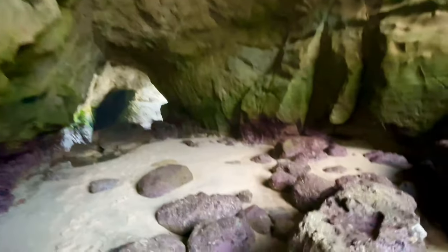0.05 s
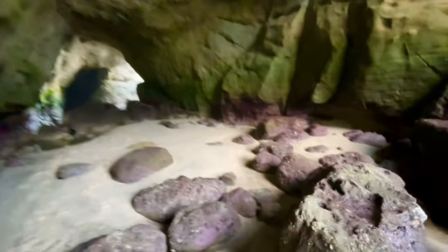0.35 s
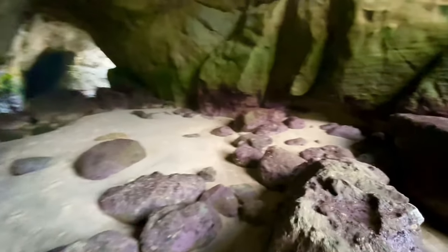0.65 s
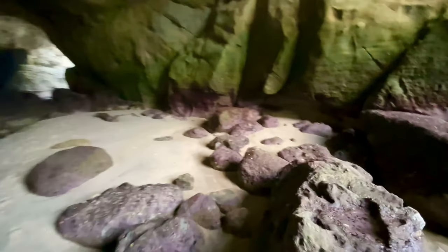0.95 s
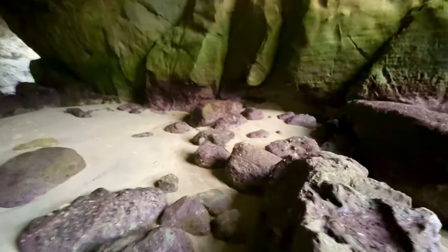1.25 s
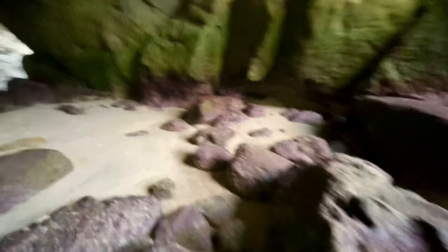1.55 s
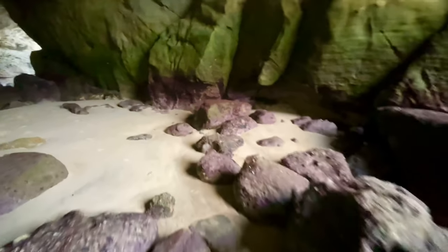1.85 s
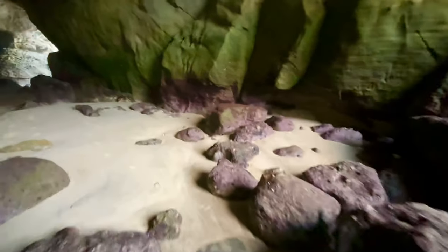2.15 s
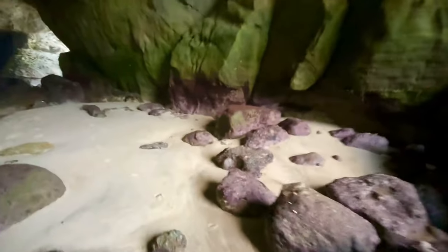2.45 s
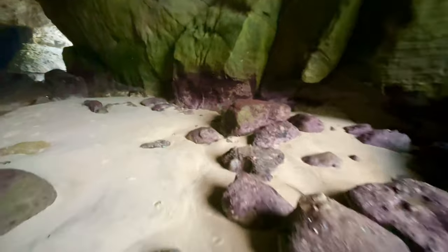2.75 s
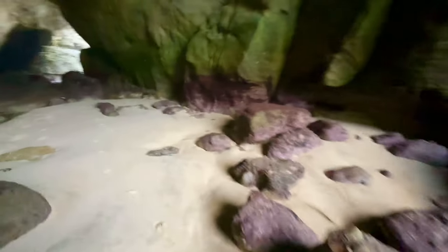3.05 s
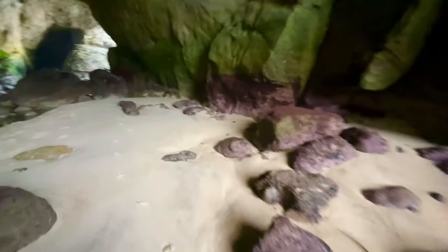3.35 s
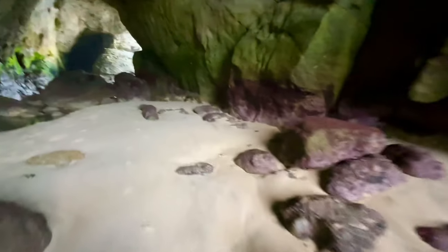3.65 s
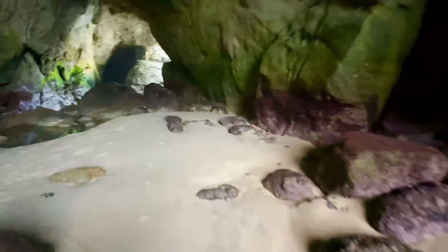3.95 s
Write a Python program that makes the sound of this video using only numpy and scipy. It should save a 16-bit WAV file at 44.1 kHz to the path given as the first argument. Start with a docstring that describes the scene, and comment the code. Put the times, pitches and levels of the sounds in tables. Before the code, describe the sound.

Surf outside fills a sea cave with a steady low roar and hollow surges. Foam hiss slowly drains away as footsteps scuff the sand, softly bumping the hand-held microphone, and a foot knocks a stone near the end.

```python
"""Surf heard inside a sea cave

The rock turns the breakers outside into a steady low roar, and surges boom in the hollow cave.
The hiss of a spent wave slowly drains away. Someone walks on the sand: soles scuff,
one knocks a stone, and soft low bumps reach the microphones they carry."""
import sys
import numpy as np
from scipy import signal
from scipy.fft import rfft, irfft, next_fast_len
from scipy.io import wavfile
from scipy.ndimage import uniform_filter1d, map_coordinates

SR = 44100
rng = np.random.default_rng(int(sys.argv[2]) if len(sys.argv) > 2 else 0)


def dump_mix(stems):
    """Bounce the given channels to the path in sys.argv[1] as a 16-bit WAV at rate SR."""
    frames = np.atleast_2d(stems).T  # one column per channel
    limited = np.clip(frames, -1, 1)  # hard clip at full scale
    pcm = np.round(limited * 32767).astype(np.int16)
    wavfile.write(sys.argv[1], SR, pcm)


N = 176400


def breakers():
    """Waves break outside; the rock muffles them to a roar over a deep rumble."""
    # how loud each is over time: t/s, level/dB
    roar_level = [(0, -31.5), (.27, -30), (.5, -30.5), (.7, -30.3), (.97, -30), (1.3, -31.7), (1.56, -31.5),
                  (1.8, -31.7), (2.12, -34), (2.35, -32.5), (2.75, -32.5), (2.95, -33.7), (3.42, -33.8),
                  (3.78, -32), (4, -32.2)]
    rumble_level = [(0, -33.5), (.4, -31), (.7, -33.5), (1.05, -33.5), (1.35, -38), (1.62, -34.5),
                    (1.85, -36.5), (2.15, -39.5), (2.45, -36), (2.8, -37), (3.1, -37.5), (3.42, -39.5),
                    (3.6, -35.5), (4, -34.5)]
    # the tone of each, from low to high: f/Hz, level/dB
    roar_tone = [(40, -36), (75, -11), (105, -3), (135, -.3), (200, -2.3), (300, -6), (450, -9.2),
                 (700, -13.3), (1000, -18), (1500, -30), (3000, -60)]
    rumble_tone = [(25, -33), (35, -17), (50, -2), (60, 0), (70, -1), (84, .7), (105, -9), (160, -24.5),
                   (400, -79)]
    rumble = amp(curve(rumble_level) + .528 * wobble(5.1)) * rush(rumble_tone, patchy_db=.5)
    roar = amp(.2 + curve(roar_level) + .3405 * wobble(8)) * rush(roar_tone, patchy_db=.7387)
    return rumble + roar


def boom():
    """Each surge of water swells and fades at the low notes of the hollow cave."""
    # the cave's notes: f/Hz, width/Hz, level/dB
    notes = [(126, 28, 0), (160, 36, 0), (220, 45, -6), (312, 25, -10)]
    # surges: crest t/s, level/dB, half length/s
    surges = [(.22, -29.5, .1), (.45, -29, .05), (.97, -29.7, .11), (1.55, -31.5, .1), (1.81, -31.7, .12),
              (2.4, -34.7, .2), (3.12, -33.3, .07), (3.73, -32, .06), (3.88, -32, .06)]

    def hollow(hz):
        return sum((-1) ** k * amp(db) * 1j * hz * width / (note ** 2 - hz ** 2 + 1j * hz * width)
                   for k, (note, width, db) in enumerate(notes))

    t = np.arange(N) / SR
    swell = sum(amp(db) * np.exp(-((t - crest) / half) ** 2) for crest, db, half in surges)
    return swell * unit(spread(filtered(rng.standard_normal((2, N)), hollow)))


def foam():
    """Foam hisses and dulls as it drains, because its finest fizz fades fastest."""
    # how loud the foam is: t/s, level/dB
    foam_level = [(0, -39.8), (.2, -38.6), (.52, -39.8), (.76, -37), (.88, -38), (1.02, -39.5),
                  (1.2, -38.2), (1.8, -41.4), (2.15, -42.8), (2.5, -44.5), (3.0, -45), (3.3, -44.6),
                  (3.5, -45.2), (4, -44.7)]
    # tone of the hiss and of the fizz: f/Hz, level/dB
    hiss_tone = [(300, -28.5), (800, -3), (1300, 0), (2000, 0), (2700, -4), (3800, -8.5), (5500, -11.5),
                 (8000, -18), (10000, -21.5), (12500, -28.5), (15500, -33)]
    fizz_tone = [(1500, -25), (4000, -0.5), (6500, -.8), (10000, -6.8), (13500, -12), (15500, -16)]
    foam_db = curve(foam_level)
    fizz_db = -51 + 1.8696 * (foam_db - foam_db.max())
    hiss = amp(foam_db - .2 + .3366 * wobble(14)) * rush(hiss_tone, patchy_db=1.0381)
    fizz = amp(fizz_db + .668 * wobble(8.675)) * rush(fizz_tone, patchy_db=2)
    return hiss + fizz


def bumps():
    """Walking sends soft low thuds to the hand-held microphones."""
    # thuds: t/s, level/dB
    thuds = [(.11, -25), (.235, -22.5), (.37, -22), (.47, -24), (.87, -26), (1.989, -23), (3.219, -24),
             (3.739, -25.5), (3.971, -24)]
    # the notes in a thud: f/Hz, level/dB, time to fade 60 dB/s
    notes = [(56.6, 1, .257), (78, -1.7, .25)]
    return sum(amp(db) * ring(notes, start, rise_s=.007845) for start, db in thuds)


def scuffs():
    """Each sole presses into the sand with a gritty swell that fades."""
    # scuffs: peak t/s, level/dB, rise/s, time to fade 60 dB/s, brightness/(dB per octave)
    presses = [(1.175, -43, .015, .2, -1.5), (1.485, -43, .0074, .2, .5), (2.195, -44.5, .012, .2, 0),
               (2.225, -41.5, .025, .35, -3.5), (2.64, -37.8, .0128, .3, 0), (2.70, -36, .03, .4, -1.9),
               (3.01, -53.5, .03, .45, 2.5), (3.52, -42.5, .003, .2, .3), (3.534, -36.5, .003, .03, 1),
               (3.539, -35, .003, .014, 1.4), (3.655, -46, .036, .55, .9)]
    # tone of crunching sand: f/Hz, level/dB
    sand_tone = [(200, -14), (600, 2), (800, 4), (1200, -1), (1900, 3), (3500, -10), (6500, -9.8),
                 (9000, -14.5), (11800, -14), (14000, -22)]
    grit_db = 3  # how uneven the crunch is
    t, out = np.arange(N) / SR, np.zeros((2, N))
    for peak, db, rise, fade, bright in presses:
        swell = np.exp(-(np.minimum(t - peak, 0) / rise) ** 2)
        decay = amp(-60 * np.maximum(t - peak, 0) / fade)
        crunch = amp(grit_db * wobble(900)) * rush(sand_tone, patchy_db=2, tilt_db=bright)
        out += amp(db) * swell * decay * unit(crunch)
    return out


def stone():
    """A sole knocks a stone and makes it ring: a dull touch, then two quick bright clacks."""
    # knocks: t/s, level/dB, brightness/(dB per octave)
    knocks = [(3.517, -32.5, -16), (3.531, -28.5, -1), (3.538, -25.5, -1.5)]
    # the stone's notes: f/Hz, level/dB, time to fade 60 dB/s
    notes = [(1053.5, -9.5, .02), (1976, -2.5, .028), (2585.6, -6, .014), (4518.3, -14, .014),
             (6296, -11, .017)]
    return sum(amp(db) * ring(notes, start, rise_s=.00033, tilt_db=bright, scatter=.008)
               for start, db, bright in knocks)


def cave_echo(sound):
    """The rock walls throw a sound back; the high notes die first."""
    # length of the echo: f/Hz, time to fade 60 dB/s
    fade_times = [(100, 1.303), (2000, 0.8435), (12000, 0.3172)]
    hz, t, bands = signal.stft(rng.standard_normal((2, SR)), SR, nperseg=256)
    tail = signal.istft(bands * amp(-60 * t / along(fade_times, hz)[:, None]), SR, nperseg=256)[1]
    tail /= np.linalg.norm(tail[0])
    return spread(signal.fftconvolve(sound, tail, axes=1)[:, :N])


def spread(pair):
    """Mix two unrelated signals into left and right, as sound comes from all around the cave."""
    # how alike the two sides are: f/Hz, likeness (1 = the same)
    likeness = [(60, .975), (150, .98), (300, .796), (650, .494), (1100, .418), (1700, .19), (2400, .947),
                (3200, 1)]
    angle = lambda hz: np.arccos(np.clip(along(likeness, hz), -1, 1)) / 2
    mid, side = filtered(pair, lambda hz: np.array([np.cos(angle(hz)), np.sin(angle(hz))]))
    return np.array([mid + side, mid - side])


def rush(tone, patchy_db, tilt_db=0):
    """Stereo noise of the given tone, with random louder and softer patches."""
    bands = signal.stft(rng.standard_normal((2, N)), nperseg=512)[2]
    patches = uniform_filter1d(uniform_filter1d(rng.standard_normal(bands.shape[1:]), 6, 0), 12, 1)
    noise = signal.istft(bands * amp(patchy_db * unit(patches)), nperseg=512)[1][:, :N]
    colour = lambda hz: amp(along(tone, hz) + tilt_db * np.log2(1 + hz / 1000))
    return unit(spread(filtered(noise, colour)))


def ring(notes, start, rise_s, tilt_db=0, scatter=.03):
    """Fading notes struck together, a little off pitch each time."""
    t = np.maximum(np.arange(N) / SR - start, 0)
    tone = 0
    for hz, db, fade in notes:
        gain = amp(db + tilt_db * np.log2(hz / notes[1][0]) - 60 * t / fade)
        pitch = hz * (1 + scatter * rng.standard_normal())
        tone += gain * np.sin(2 * np.pi * pitch * t)
    return tone * (1 - np.exp(-t / rise_s))


def amp(db):
    """Turn decibels into a gain."""
    return 10 ** (np.asarray(db) / 20)


def along(rows, hz):
    """Look up (f/Hz, value) rows on a log frequency scale."""
    freqs, values = np.transpose(rows)
    return np.interp(np.log(hz + 1), np.log(freqs + 1), values)


def unit(x):
    """Scale to an average strength (rms) of 1."""
    return x / np.sqrt(np.mean(x ** 2) + 1e-20)


def curve(rows):
    """One value per sample from (t/s, value) rows."""
    return np.interp(np.arange(N) / SR, *np.transpose(rows))


def wobble(rate):
    """A smooth curve through `rate` random points a second."""
    return map_coordinates(rng.standard_normal(int(N * rate / SR) + 4), [np.arange(N) * rate / SR])


def filtered(x, response):
    """Scale each frequency in x by response(hz)."""
    size = next_fast_len(N + SR // 2)
    return irfft(rfft(x, size) * response(np.fft.rfftfreq(size, 1 / SR)), size)[..., :N]


def scene():
    """Surf, the cave's boom, and the steps with their echo."""
    steps = scuffs() + stone()
    return breakers() + foam() + bumps() + steps + amp(-13) * cave_echo(steps) + boom()


def record(dry):
    """The microphones colour the sound; a phase twist widens the treble, and the very top is cut."""
    # the microphone openings ring a little and lose the highest treble: f/Hz, level/dB
    port_tone = [(1600, -.5), (1900, .8), (2200, -.9), (3000, -.3), (7000, -.3), (10000, -.3),
                 (13000, -1.4)]
    # how much louder the right side is: f/Hz, level/dB
    right_louder = [(30, 1), (70, 1.8), (160, 3.3), (450, 1.7), (1400, 0), (1850, -5), (2300, -1.8),
                    (2900, 0)]
    # a twist that shifts left against right by frequency: f/Hz, phase/rad
    phase_twist = [(0, 0), (1030, 0.3), (2070, -0.1), (2760, 0.0), (6200, -0.0), (6460, -0.5), (7490, -1.9),
                   (7900, -3.0), (8700, -3.3), (9130, -4.1), (10200, -5.1), (10900, -6.0), (12200, -6.8),
                   (13400, -8.1), (14000, -9.3), (15700, -9.5)]
    top_hz = 15700
    sides = np.array([[1], [-1]])  # left, right

    def response(hz):
        gain = amp(along(port_tone, hz) - sides * along(right_louder, hz) / 2)
        return gain * np.exp(.5j * sides * along(phase_twist, hz)) * (hz < top_hz)

    return filtered(dry, response)


dry = scene()
out = record(dry)
dump_mix(out)
```